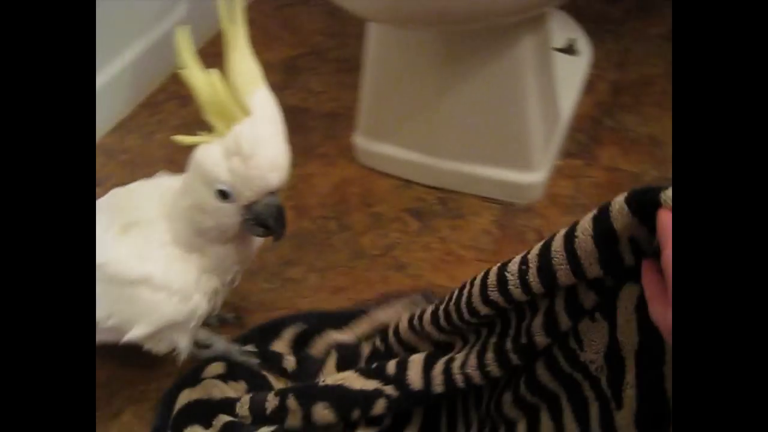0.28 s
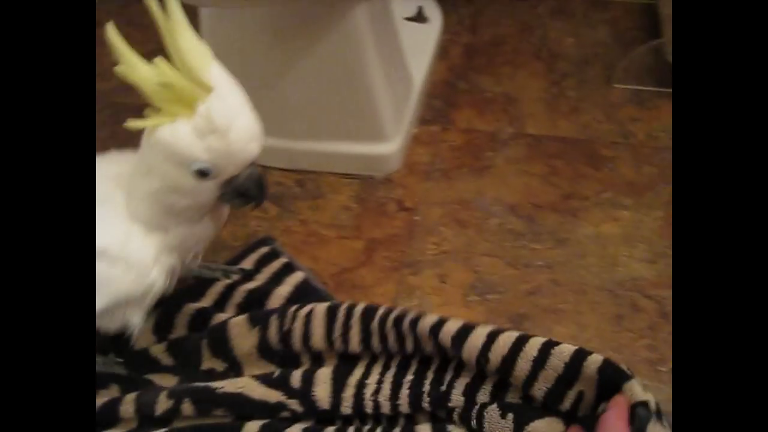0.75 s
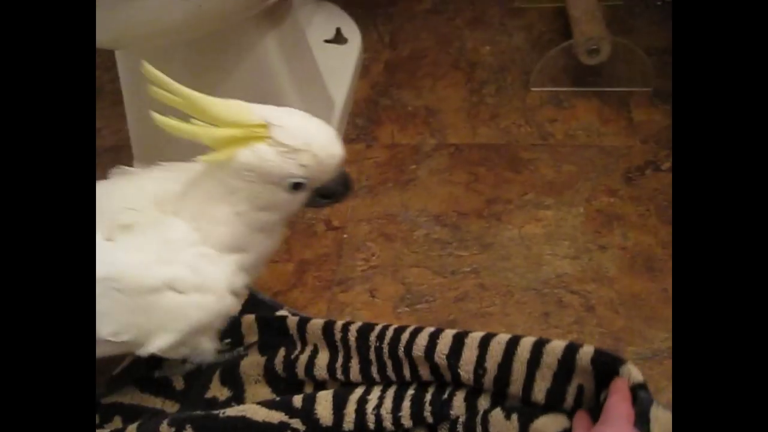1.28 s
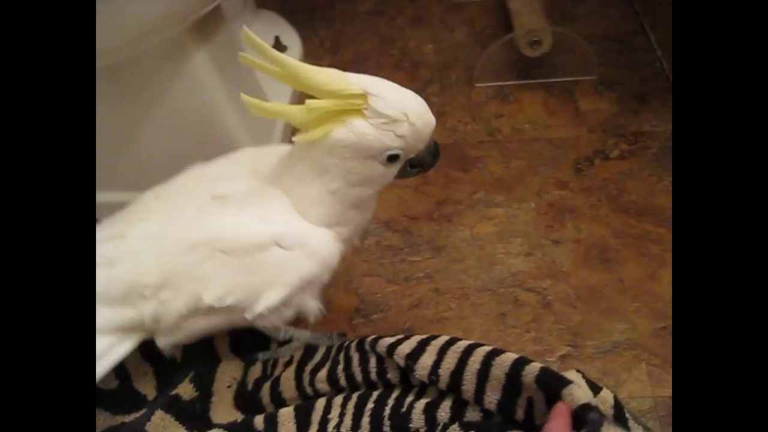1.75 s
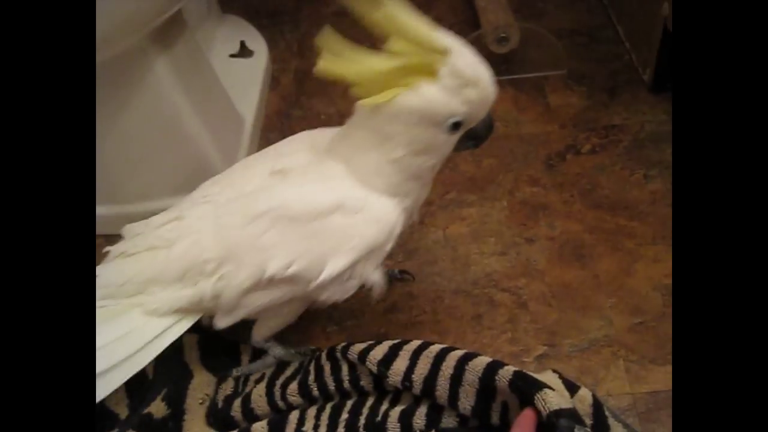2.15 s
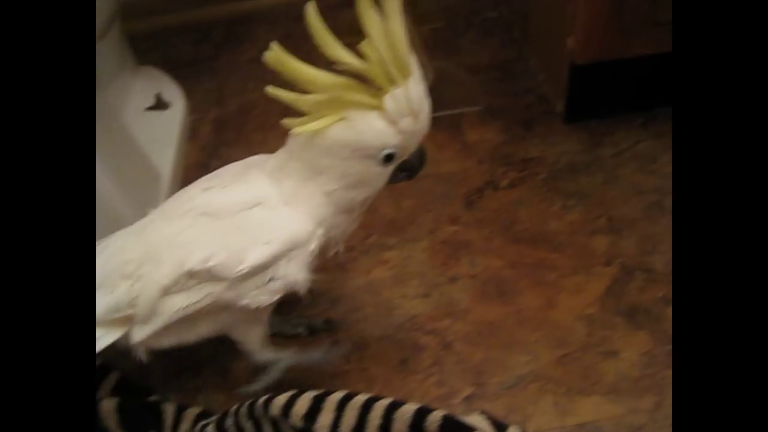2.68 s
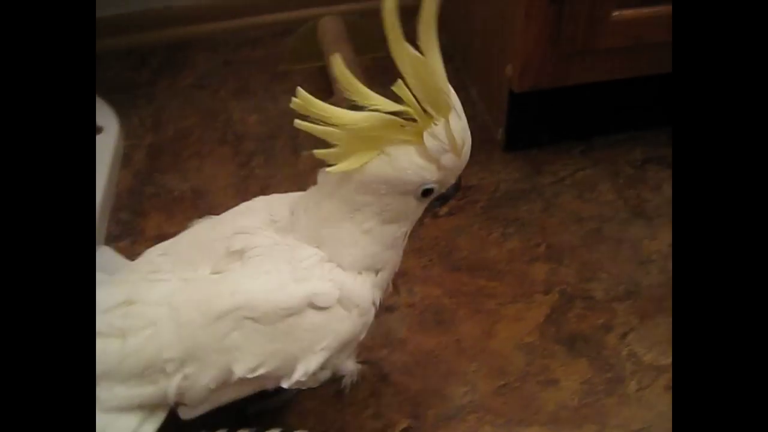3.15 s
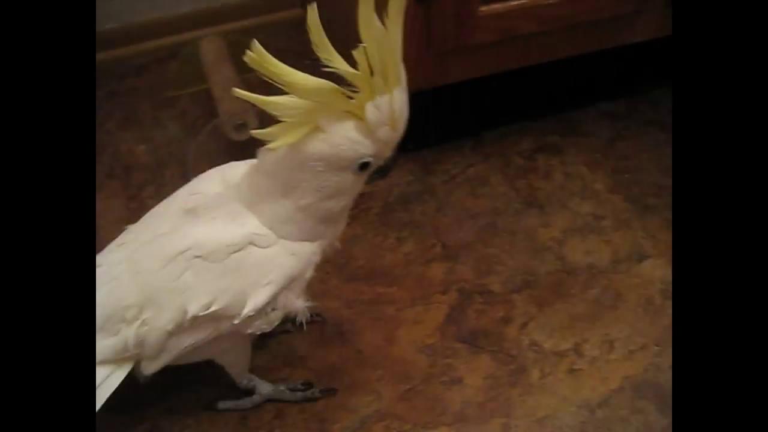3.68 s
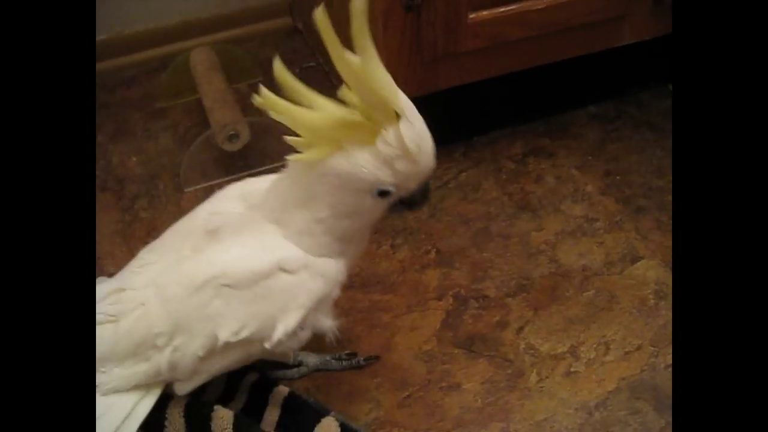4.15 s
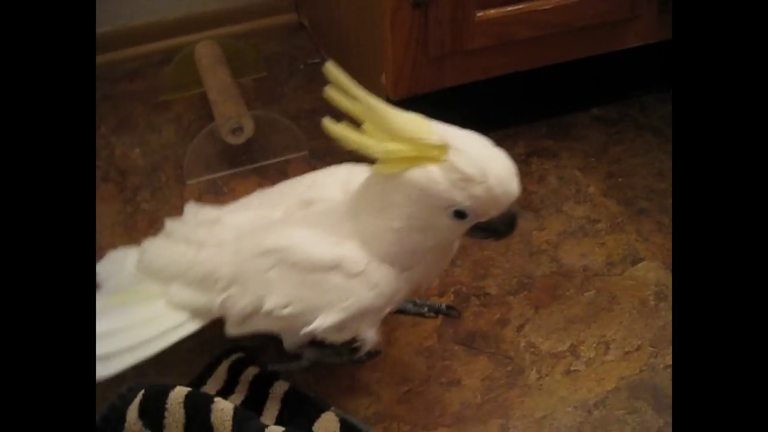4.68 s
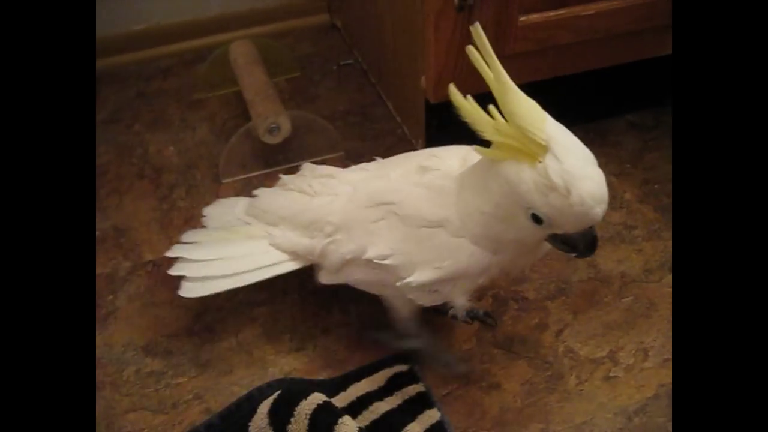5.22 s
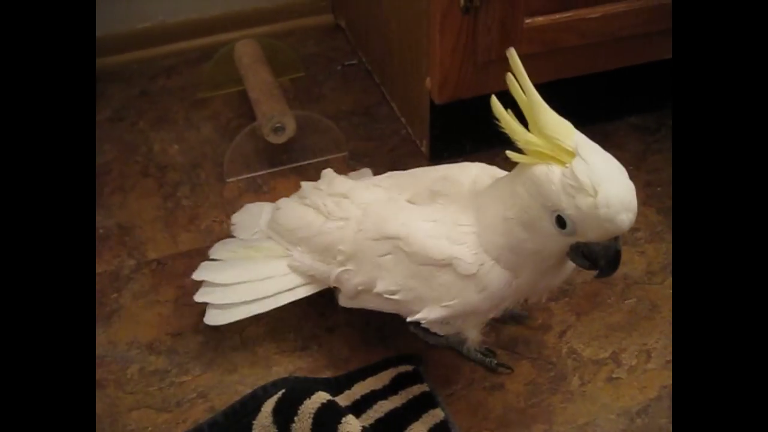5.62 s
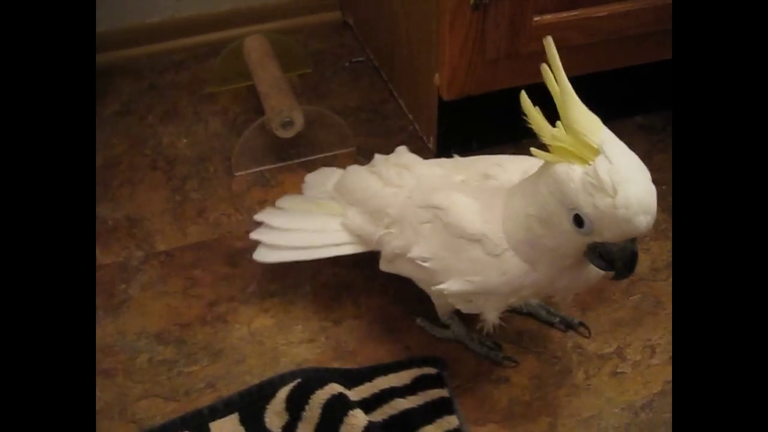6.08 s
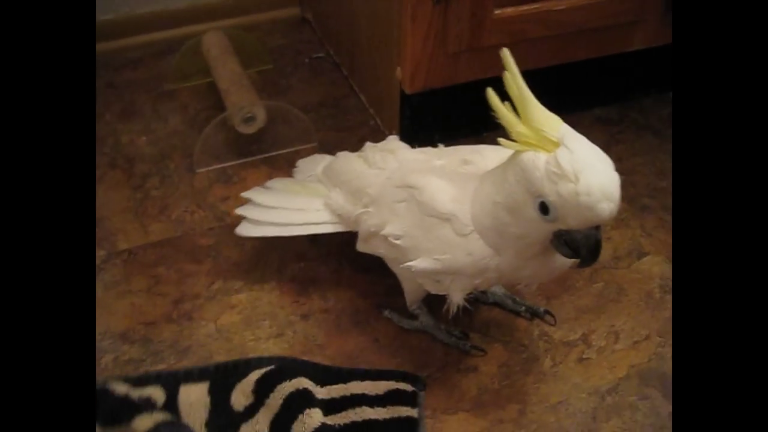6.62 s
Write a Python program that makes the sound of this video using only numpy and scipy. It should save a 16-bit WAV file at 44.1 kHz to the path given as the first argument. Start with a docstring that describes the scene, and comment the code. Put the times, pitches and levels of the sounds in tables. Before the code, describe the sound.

Bright claw taps and short gritty slips, heard close with quick hard-room echoes. Sharp steps land irregularly, some as rapid clusters, with soft sole pats and cloth rub. Past the middle, scratchy dragging takes over and the bird gives several very brief, buzzy clucks. It ends nearly still, with only faint scraping and rustle over thin hiss and motor hum.

```python
"""Claws of a cockatoo tick and skid close to the microphone, on cloth and hard floor in a small bathroom.
Ticks are chattering impacts that ring, skids are noise in a sinking band, dragging feet are low coarse noise.
The bird gives short clucks, falling tones with a buzz through fixed throat resonances; soles pat the floor.
Shaped noise makes the rustle of feathers and cloth; hiss, hum and a thin whine lie under it all.
Early echoes and noisy tails place the bird in the room."""
import sys
import numpy as np
from scipy import signal
from scipy.io import wavfile
from scipy.ndimage import uniform_filter1d

SR = 44100
rng = np.random.default_rng(int(sys.argv[2]) if len(sys.argv) > 2 else 0)


def level_to_linear(level):
    """Convert decibel levels to linear amplitude factors, elementwise."""
    exponent = np.asarray(level, float) / 20
    return 10 ** exponent


def int16_out(signal):
    """Quantize to a 16-bit WAV file."""
    q = np.round(np.clip(np.atleast_2d(signal).T, -1, 1) * 32767)
    wavfile.write(sys.argv[1], SR, q.astype(np.int16))


N = 301991  # samples

# body of a claw's scratch: (frequency [Hz], level [dB])
SCRATCH_SPECTRUM = [(1500, -25.5), (2600, 2.5), (3500, 3.5), (6500, 4.5), (7300, 0.5), (8200, -35),
                    (12000, -49)]
# sharp edge of claw contact, around 8 to 11 kHz: (frequency [Hz], level [dB])
EDGE_SPECTRUM = [(7000, -18.5), (8600, -6), (9900, -4), (11200, -13.5), (12600, -29.5)]
# coarse low rasp of foot and cloth: (frequency [Hz], level [dB])
RASP_SPECTRUM = [(400, -25), (900, 1.5), (2200, 11.5), (3200, 3.5), (6000, -57.5)]


def evened(x):
    """Scales to rms 1."""
    return x / np.sqrt(np.mean(x ** 2) + 1e-20)


def peaked(x):
    """Scales to peak 1."""
    return x / abs(x).max()


def read(points, hz):
    """Reads a table on a log-frequency axis."""
    f, value = np.transpose(points)
    return np.interp(np.log(hz + 1), np.log(f + 1), value)


def add(mix, s, sound):
    """Mixes a sound in from time s, cut at the end of the mix."""
    part = mix[round(s * SR):][:len(sound)]
    part += sound[:len(part)]


def coloured(x, points):
    """Causal minimum-phase filter with the given spectrum."""
    hz = abs(np.fft.fftfreq(4096, 1 / SR))
    log_gain = np.log(level_to_linear(np.maximum(read(points, hz), -100)))
    response = np.exp(signal.hilbert(log_gain).conj())
    taps = np.fft.ifft(response).real[:2048]
    return signal.oaconvolve(x, taps)[:len(x)]


def resonate(x, hz, width):
    """A resonance of gain 1, width in Hz, whose frequency may follow a curve."""
    turn = np.exp(2j * np.pi * np.cumsum(hz * np.ones(len(x))) / SR)
    r = np.exp(-np.pi * width / SR)
    # shift the resonance down to 0 Hz, smooth there, shift back
    smoothed = signal.lfilter([1 - r], [1, -r], x / turn + 1e-18)
    return 2 * (turn * smoothed).real


def air():
    """Room hiss with faint drifting patches, motor hum and a thin whine."""
    # colour of the hiss: (frequency [Hz], relative level [dB])
    hiss_spectrum = [(20, -40), (55, -2.5), (110, -9), (240, -4), (300, -6.5), (400, -2.5), (470, -4.5),
                     (800, -6), (1500, -9.5), (4000, -15.5), (6500, -20), (7700, -19.5), (9500, -15.5),
                     (11000, -19.5), (12500, -50)]
    # motor hum partials: (frequency [Hz], level [dB rms])
    hum_partials = [(59.2, -73.5), (118.4, -69), (177.6, -71), (236.9, -70.5), (355.3, -69), (414.5, -69)]
    hiss_db = -53  # rms
    frames, hz, t = N // 256 + 5, np.fft.rfftfreq(1024, 1 / SR), np.arange(N) / SR
    real, imaginary, patches = rng.standard_normal((frames, 513, 3)).T
    patches = uniform_filter1d(patches, size=14, axis=0)  # over frequency
    patches = evened(uniform_filter1d(patches, size=12, axis=1))  # over time
    gain = level_to_linear(read(hiss_spectrum, hz)[:, None] + .8 * patches)
    hiss = signal.istft((real + 1j * imaginary) * gain, nperseg=1024, noverlap=768)[1][:N]
    hum = sum(level_to_linear(db) * np.sin(2 * np.pi * (f * t + rng.random())) for f, db in hum_partials)
    whine_db = np.where((t > 2.5) & (t < 5.5), -62.5, -71.5)  # stronger for three seconds
    whine = level_to_linear(whine_db) * evened(resonate(rng.standard_normal(N), 960, width=2.68))
    return level_to_linear(hiss_db) * evened(hiss) + np.sqrt(2) * hum + whine


def rustle():
    """Soft wide noise of feathers and cloth, its level rising and falling."""
    # faint stir of feathers and cloth: (time [s], level [dB])
    stir_levels = [(0, -55), (.5, -49.5), (1.15, -57.5), (1.6, -53), (1.851, -61), (2.75, -60.5),
                   (3.05, -50.5), (3.4, -64), (4.05, -54), (4.2, -66), (5.03, -53.5), (5.4, -82),
                   (5.85, -56), (6.1, -60.5), (6.45, -53), (6.85, -55.5)]
    stir = rng.standard_normal(N)
    wide = evened(coloured(stir, SCRATCH_SPECTRUM))
    wide += .5 * evened(coloured(stir, EDGE_SPECTRUM))
    wide += .5 * evened(coloured(stir, RASP_SPECTRUM))
    return level_to_linear(np.interp(np.arange(N) / SR, *np.transpose(stir_levels))) * wide


def scattered():
    """An uneven surface spreads one echo over more than half a millisecond."""
    spread = .4 * np.exp(-np.arange(32) / 9) * rng.standard_normal(32)
    spread[0] = 1
    return spread / np.linalg.norm(spread)


def room(x):
    """Strong early echoes, then fluttering noisy tails that die band by band."""
    # echoes off the floor, nearest walls and fittings: (delay [s], level [dB])
    echoes = [(.0009, -17), (.0034, -9), (.0043, -16), (.0064, -12), (.0085, -20.5), (.013, -21),
              (.0175, -20.5)]
    # decay of the tail: (frequency [Hz], time to fall 60 dB [s])
    decay_times = [(300, 0.48), (800, 0.3), (2100, 0.24), (5500, 0.25), (11000, 0.209)]
    # colour of the tail at its start: (frequency [Hz], relative level [dB])
    tail_spectrum = [(300, 4.5), (800, -1), (2500, -1), (6000, -4), (11000, -1)]
    tail_db = -2  # energy re the direct sound
    early = np.zeros(1024)
    early[0] = 1
    for s, db in echoes:
        add(early, s, level_to_linear(db) * scattered())
    hz, t, z = signal.stft(rng.standard_normal((4, SR // 2)), SR, nperseg=256)
    dying_db = read(tail_spectrum, hz)[:, None] - 60 * t / read(decay_times, hz)[:, None]
    tails = signal.istft(z * level_to_linear(dying_db), SR, nperseg=256)[1]
    tails *= np.minimum(np.arange(tails.shape[1]) / SR / 0.00073, 1) ** 2  # builds up over the first bounces
    tails *= level_to_linear(tail_db) / np.linalg.norm(tails, axis=1, keepdims=True)
    turn = 2 * np.pi * 37 * np.arange(N) / SR  # the four tails take turns, 37 rounds a second
    shares = np.maximum([np.cos(turn), np.sin(turn), -np.cos(turn), -np.sin(turn)], 0)
    late = signal.fftconvolve(x * shares, tails, axes=1)[:, :N].sum(0)
    return signal.oaconvolve(x, early)[:N] + late


def pat(db, hz, length):
    """The sole meets the hollow floor: a rounded low push."""
    t = np.arange(round(length * SR)) / SR - length / 2
    return level_to_linear(db) * np.cos(2 * np.pi * hz * t) * np.hanning(len(t))


def stroke(rise, fall):
    """Time from the peak and level in dB of one push: up, over the top, down."""
    t = np.arange(-rise, fall, 1 / SR)
    end_db, bend = -28, 1.53  # loss at either end, and how round the top is
    return t, end_db * np.where(t < 0, -t / rise, t / fall) ** bend


def slipping(n):
    """Dense uneven slips: noise with a wandering grip and rare strong catches."""
    fine, lump, catch = rng.standard_normal((n, 3)).T
    grip_db = 2.0 * evened(uniform_filter1d(lump, size=120)) + 7.0 * (catch > 3.0)
    return fine * level_to_linear(grip_db)


def drag(s, db, rise, fall):
    """Foot and cloth rub: the claws' kind of slips, coarse and low."""
    t, shape_db = stroke(rise, fall)
    return s - rise, level_to_linear(db + shape_db) * evened(coloured(slipping(len(t)), RASP_SPECTRUM))


def cluck(s, length, first_hz, last_hz, tone_db, buzz_db):
    """A falling tone; each of its cycles also snaps a rough pulse into the fixed throat."""
    # throat resonances: (frequency [Hz], width [Hz], level [dB])
    throat = [(1270, 850, -4.5), (2320, 346, 3), (2900, 237, 4.5), (4050, 180, -4.5), (4800, 190, -4),
              (6500, 780, -15)]
    # how well the tone speaks at each pitch: (frequency [Hz], level [dB])
    tone_response = [(360, -5), (520, -5.5), (750, -2), (1000, -6), (1400, -12.5), (1900, -4.5),
                     (2300, 0.5), (2700, -15)]
    t = np.arange(0, length, 1 / SR)
    u = t / length
    hz = last_hz + (first_hz - last_hz) * (1 - u) ** 1.4  # falls fast, then settles
    fade_db = -4 * u ** 4
    tone = level_to_linear(tone_db + read(tone_response, hz) + fade_db) * np.minimum(t / 0.0015, 1)
    # the buzz peaks at 0.4 of the cluck and is 15 dB down at its ends
    effort = level_to_linear(buzz_db - 15 * np.interp(u, [0, 0.4, 1], [1, 0, 1]) ** 2)
    jitter, breath = rng.standard_normal((len(t), 2)).T
    unsteady_hz = hz * (1 + 0.035 * evened(uniform_filter1d(jitter, size=60)))
    angle = 2 * np.pi * np.cumsum(unsteady_hz) / SR
    pulses = sum((hz * k < 9000) * np.cos(k * angle) for k in range(1, 20))
    drive = evened(pulses) + .2 * breath * (1 + np.cos(angle))  # breath noise swells with each pulse
    buzz = sum((-1) ** k * level_to_linear(db) * resonate(drive, f, width)
               for k, (f, width, db) in enumerate(throat))
    voice = tone * np.cos(angle) + effort * evened(buzz)
    return s, voice * signal.windows.tukey(len(t), .12)


def skid(s, db, rise, fall, top_hz, edge_db):
    """A claw slips along: past the peak the scratch band sinks as the claw slows, and grows narrower."""
    t, shape_db = stroke(rise, fall)
    hz = np.maximum(top_hz - 5400 * np.maximum(t, 0), 2800)  # sinks by 5400 Hz per second
    slips = slipping(len(t))
    body = evened(coloured(slips, SCRATCH_SPECTRUM))
    wide = evened(resonate(body, hz, width=2600))
    narrow = evened(resonate(resonate(body, hz, 1300), hz, 1300))
    # a lower scratch is more focused on its centre
    focus = np.clip(0.11 - 0.5 * (hz - 4500) / 1000, .15, 1)
    scratch = (1 - focus) * wide + focus * narrow
    # the edge swells and fades more steeply than the scratch
    edge = level_to_linear(edge_db + 0.173 * shape_db) * evened(coloured(slips, EDGE_SPECTRUM))
    rasp = level_to_linear(-17.5) * evened(coloured(slips, RASP_SPECTRUM))
    whole = scratch + edge + rasp
    return s - rise, level_to_linear(db + shape_db) * whole * signal.windows.tukey(len(t), .1)


def tick(db, hz, thud_db, edge_db):
    """A claw tip lands and chatters; it rings briefly, the toe adds a dull thud."""
    # crack of claw on the floor: (frequency [Hz], level [dB])
    crack_spectrum = [(590, -26.5), (1000, -4), (2210, 1), (2970, 2), (3270, 1.5), (6290, 5), (7850, -4),
                      (8730, -7), (10100, -9.5), (11700, -41), (12500, -44.5), (16200, -52), (22000, -120)]
    t = np.arange(1024) / SR
    size, chance, soft = rng.standard_normal((1024, 3)).T
    touch = .6 * size * (chance > 1.1) * np.exp(-t / .0018)  # sparse chatter that dies away
    touch[0] = 1
    crack = coloured(touch, crack_spectrum)
    snap = peaked(crack) + .7 * peaked(resonate(crack, hz, 1400))
    toe = soft * np.exp(-t / 0.0031)
    thud = peaked(resonate(resonate(toe, 760, 720), 920, 1050))
    edge = peaked(coloured(touch, EDGE_SPECTRUM))
    return level_to_linear(db) * (peaked(snap) + level_to_linear(thud_db) * thud + level_to_linear(edge_db) * edge)


def scene():
    """Bird in the room over the steady air; the pats come through the floor, without the room."""
    # soft pats of the sole: (start [s], peak level [dB], frequency [Hz], length [s])
    pats = [(1.419, -18.5, 300, 0.00053), (1.433, -39.5, 303, 0.0197), (2.013, -38.5, 342, 0.0296),
            (2.892, -40.5, 324, .026)]
    # coarse drags of foot and cloth: (time of the peak [s], level there [dB], rise [s], fall [s])
    drags = [(.5, -56, .1, 0.355), (.61, -56, 0.085, 0.099), (1.93, -50, 0.024, 0.0142),
             (2.859, -52.5, .07, 0.0088), (3.06, -51.5, 0.053, 0.051), (3.115, -44, 0.0187, 0.076),
             (3.994, -58, 0.078, 0.12), (4.471, -53, .15, .1), (5.071, -56, 0.034, 0.065),
             (5.286, -50, 0.0725, 0.046), (5.55, -52, 0.0267, .1), (5.754, -46.5, 0.029, .09),
             (6.531, -61, 0.33, 0.23)]
    # clucks: (start [s], length [s], first pitch [Hz], last pitch [Hz], tone before the
    # response to pitch [dB], buzz in the throat [dB])
    clucks = [(4.337, 0.019, 865, 810, -34.5, -40), (4.543, 0.011, 1045, 600, -26, -34),
              (4.724, 0.012, 2553, 2220, -36.5, -75), (4.7747, 0.015, 1086, 425, -24.5, -22.5),
              (5.018, .022, 964, 349.6, -30, -34.5), (5.276, .016, 1007, 556, -33, -37),
              (5.48, 0.035, 2298, 551, -28.5, -29.5), (5.7367, .04, 2522, 472, -30, -33.5)]
    # skids of the claws: (time of the peak [s], level of the scratch there [dB], rise [s], fall [s],
    # centre of the scratch at the peak [Hz], edge re scratch [dB])
    skids = [(0.432, -34, .02, 0.048, 5430, -6.5), (.475, -53.5, 0.033, 0.048, 4500, -15.5),
             (0.566, -46, 0.064, 0.029, 4400, -9), (.654, -57, 0.059, .13, 4970, -18),
             (1.929, -36, 0.03, 0.01, 5700, -10.5), (2.79, -56, 0.021, 0.164, 4840, -3),
             (3.058, -44, 0.048, 0.024, 5130, -9), (3.139, -43.5, 0.069, .06, 3470, -14),
             (3.229, -38.5, 0.029, 0.045, 4680, -12), (3.565, -38, 0.0888, .13, 5020, -10),
             (3.94, -37.5, .05, 0.12, 4070, -11), (4.049, -50, 0.045, 0.071, 4200, -9),
             (4.35, -37, 0.062, 0.15, 5240, -6), (4.426, -39, .06, 0.069, 3980, -25),
             (4.534, -41, 0.12, .008, 3240, -25), (4.583, -38.5, .008, 0.077, 4300, -15.5),
             (5.112, -44, 0.094, 0.073, 3790, -9), (5.223, -34, 0.1276, 0.095, 4750, -9),
             (5.61, -40.5, 0.076, 0.26, 5340, -9), (5.709, -43, 0.13, .06, 3900, -25),
             (5.756, -53, 0.0206, 0.055, 3100, -6), (6.33, -51, 0.14, 0.37, 5900, -1),
             (6.6, -66, 0.21, 0.32, 4300, 1)]
    # claw strikes: (time [s], peak of the snap [dB], ring of claw and tile [Hz],
    # thud of the toe re snap [dB], edge re snap [dB])
    strikes = [(0.1322, -30, 3100, -5.5, -17), (0.2546, -20.5, 4880, -49, -15),
               (0.2929, -19.5, 4800, -51, -12), (0.434, -18, 5600, -23, -6.5), (0.463, -26, 4750, -12, -7),
               (0.4849, -22, 4300, -21, -11), (.499, -40, 1000, 9.5, -30), (0.6173, -22.5, 3610, -19, -24),
               (0.6464, -18, 5850, -29, -7), (0.9434, -35.5, 1880, -6, -17.5), (1.125, -37.5, 3000, -8, -5),
               (1.3873, -23, 1500, -7.5, -29), (1.4189, -8, 4200, -24, -6), (1.4219, -11, 3270, -36, -22),
               (1.4229, -10.5, 5600, -19.5, -20), (1.7382, -10.5, 3050, -32, -22),
               (1.7399, -13, 5100, -15.5, -11), (1.9301, -23, 4560, -43, -25),
               (1.9864, -21, 3000, -35, -11), (1.9876, -15, 5640, -24.5, -25),
               (2.0057, -8.5, 4830, -25, -4), (2.009, -9, 4960, -33, -27), (2.0135, -30, 4830, -28, -29.5),
               (2.302, -26, 1630, -12, -34), (2.4257, -33, 3170, -25, -22), (2.56, -35, 5240, -31, -5),
               (2.8672, -15.5, 3720, -17, -17), (2.8799, -9, 5460, -19, -9.5),
               (2.8834, -14.5, 4170, -22, -19), (3.101, -19, 3040, -17.5, -25),
               (3.2008, -13.5, 4130, -42, -10.5), (3.2072, -16, 5600, -23, -26.5),
               (3.922, -27.5, 4000, -32, -15), (3.9885, -20, 5000, -33, -20),
               (4.316, -30.5, 3000, -11, -19), (4.5683, -12.5, 4040, -33, -17),
               (4.65, -38, 6500, -29.5, -2.5)]
    bird, floor = np.zeros(N), np.zeros(N)
    for s, *push in pats:
        add(floor, s, pat(*push))
    for source, rows in (drag, drags), (cluck, clucks), (skid, skids):
        for row in rows:
            add(bird, *source(*row))
    for s, *strike in strikes:
        add(bird, s, tick(*strike))
    # the bird's sounds carry little below 200 Hz
    small = signal.sosfilt(signal.butter(2, 200, "high", fs=SR, output="sos"), bird)
    return (room(small) + floor + rustle() + air())[None]


def band_limit(x):
    """A steep low-pass at the top of the band."""
    return signal.sosfilt(signal.butter(12, 12650, fs=SR, output="sos"), x)


def record(dry):
    """Band limit of the small camera that hears the bird, at 12070 Hz."""
    low_pass = signal.firwin(201, 12070, window=("kaiser", 8), fs=SR)
    limited = signal.oaconvolve(dry, low_pass[None], "same")
    return band_limit(limited)


dry = scene()
out = record(dry)
int16_out(out)
```